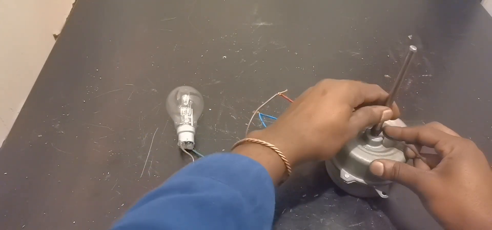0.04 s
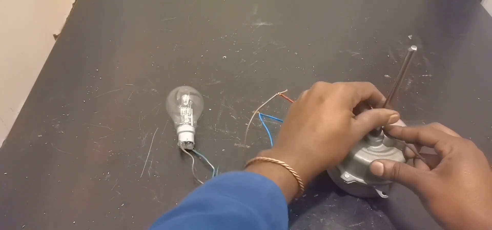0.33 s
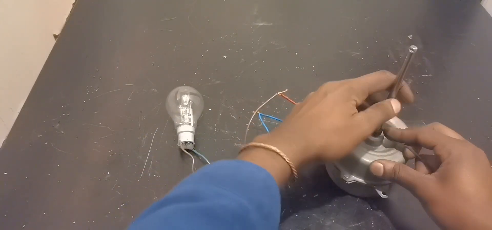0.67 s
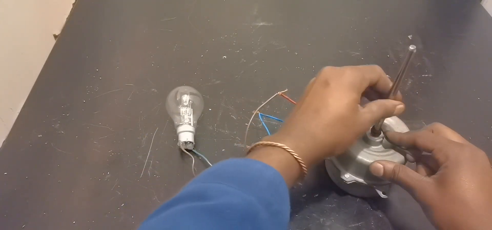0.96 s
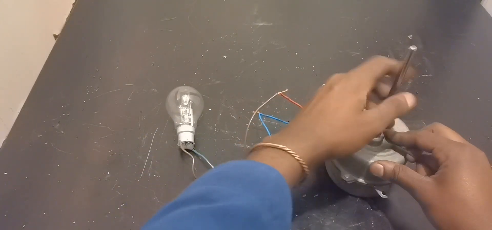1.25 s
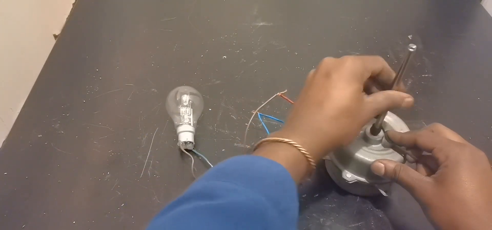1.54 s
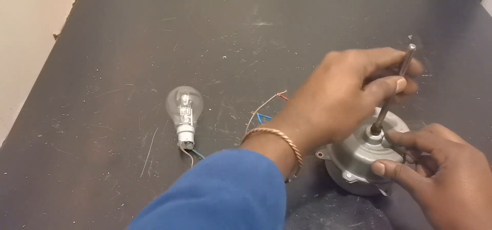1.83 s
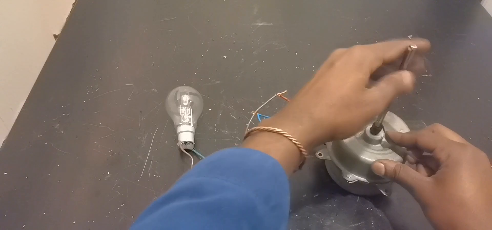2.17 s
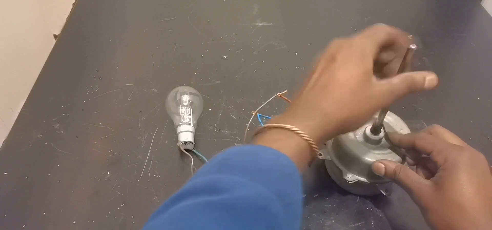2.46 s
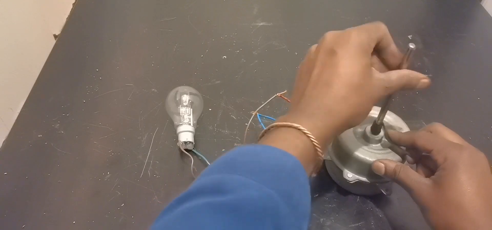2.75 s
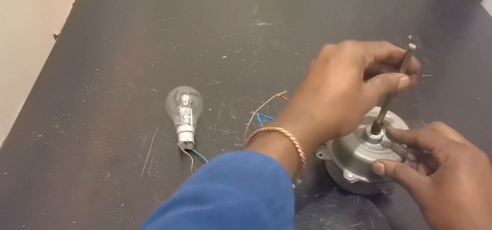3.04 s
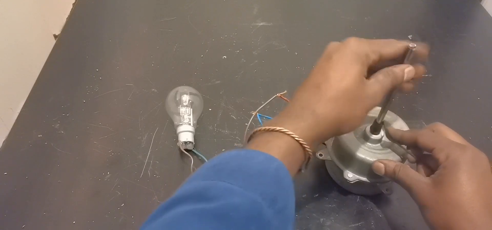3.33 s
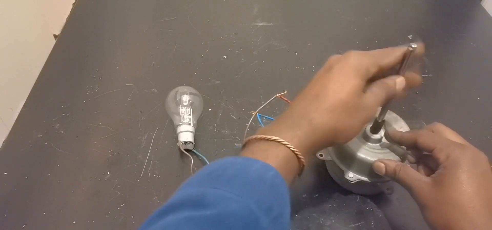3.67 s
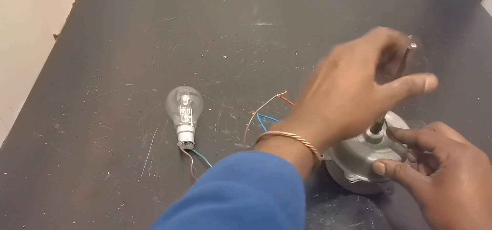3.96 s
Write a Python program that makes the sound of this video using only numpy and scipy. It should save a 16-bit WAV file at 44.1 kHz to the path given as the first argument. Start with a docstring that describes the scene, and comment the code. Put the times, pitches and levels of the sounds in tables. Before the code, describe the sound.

A small electric motor is twisted by hand on a table, giving short, rough whirs with a low hum and dry bearing rattle. The pulses grow louder, with soft thumps and faint ticks, close by in a quiet room.

```python
"""Twisting a small motor by hand.

One hand holds an electric motor on a table in a small quiet room; the other twists its shaft,
again and again and ever harder. The rotor judders and hums through the table top, and the dry
bearings rattle and hiss in the metal housing. The motor rocks, thumps and clunks as the
fingers take hold, with a few faint ticks."""
import sys
import numpy as np
from scipy import signal
from scipy.fft import rfft, irfft
from scipy.io import wavfile
from scipy.ndimage import uniform_filter1d

SR = 44100
rng = np.random.default_rng(int(sys.argv[2]) if len(sys.argv) > 2 else 0)


def inscribe(sig):
    """Save sig as 16-bit PCM at rate SR to the path in sys.argv[1].

    A 1-D sig is mono; a 2-D sig holds one channel per row.
    Samples are clipped to [-1, 1] before scaling.
    """
    pcm = np.round(np.clip(np.atleast_2d(sig).T, -1, 1) * 32767)
    wavfile.write(sys.argv[1], SR, pcm.astype(np.int16))


N = 176400  # 4 seconds
LEFT_VS_RIGHT = np.array([[1], [-1]])


def undb(db):
    """Turn decibels into a number to multiply by."""
    return 10 ** (np.asarray(db) / 20)


def unit(x):
    """Scale a sound to an average power of 1."""
    return x / np.sqrt(np.mean(x ** 2))


def steady(x, span_s):
    """Even out the slow swells of a vibration."""
    power = np.mean(np.atleast_2d(x) ** 2, axis=0)
    span = max(int(span_s * SR), 2)
    smooth_power = uniform_filter1d(uniform_filter1d(power, span), span)
    return x / np.sqrt(np.abs(smooth_power) + 1e-18)


def wander(per_s):
    """A smooth random drift, roughly between -1 and 1."""
    hold = int(SR / per_s)
    steps = np.repeat(rng.standard_normal(N // hold + 1), hold)
    return 1.3 * uniform_filter1d(uniform_filter1d(steps, hold), hold)[:N]


def frequencies():
    """The frequencies the filters work on, in Hz."""
    return np.maximum(np.arange(N + 1) * SR / (2 * N), 1)


def colour(x, points):
    """Shape the bass and treble along a curve of (frequency [Hz], level [dB]) points."""
    hz, db = np.array(points).T
    gain = undb(np.interp(np.log(frequencies()), np.log(hz), db))
    cepstrum = irfft(np.log(gain))
    cepstrum[1:N] *= 2  # folded forward, so nothing sounds before its cause
    cepstrum[N + 1:] = 0
    return irfft(rfft(x, 2 * N) * np.exp(rfft(cepstrum)))[..., :N]


def ring(x, notes):
    """Shake an object so that it rings at its own notes."""
    f = frequencies()
    gain = 0
    for k, (hz, width, db) in enumerate(notes):
        resonance = undb(db) / (1 + 1j * (f * f - hz * hz) / (f * width))
        softening = 1 + 1j * f / hz - (f / hz) ** 2 / 2  # contact dulls what lies far above the note
        gain = gain + (-1) ** k * resonance / softening
    return irfft(rfft(x, 2 * N) * gain)[..., :N]


def burst(fade_s, channels):
    """A puff of noise that falls by 60 dB in fade_s."""
    t = np.arange(SR // 2) / SR
    x = rng.standard_normal((channels, len(t))) * np.exp(-np.log(1000) * t / fade_s)
    return x / np.sqrt(np.sum(x ** 2, axis=1, keepdims=True))


def clicks(times, sizes):
    """One sharp click at each time, given in seconds."""
    inside = (times >= 0) & (times < (N - 1) / SR)
    return np.bincount((times[inside] * SR).astype(int), sizes[inside], N)


def impacts(per_s, jitter, scatter_db):
    """A run of tiny hits, uneven in timing (jitter) and strength (scatter)."""
    gap, size = rng.standard_normal((20000, 2)).T
    times = np.cumsum(np.exp(jitter * gap)) / per_s
    hits = clicks(times, undb(scatter_db * size))
    return hits - hits.mean()


def pan(x, pan_db):
    """Make the left side pan_db louder than the right."""
    return x * undb(LEFT_VS_RIGHT * pan_db / 2)


def room(x, echo_db, pan_db=0):
    """Add the small room's echo, different on the left and right."""
    echo = signal.fftconvolve(x[None], burst(fade_s=.2, channels=2), axes=1)[:, :N]
    return pan((x + undb(echo_db) * echo) / np.hypot(1, undb(echo_db)), pan_db)


# tone of the room's air (frequency [Hz], level [dB])
AIR_TONE = [(20, 4), (33, 2.5), (50, -10.5), (80, -0.5), (140, -1), (250, -10), (400, -19.5), (630, -19.5),
            (1050, -26.5), (1600, -29.5), (3200, -34), (6500, -37.5), (8000, -44.5), (10000, -60.5),
            (13000, -52)]
# tone of the microphone's hiss (frequency [Hz], level [dB])
MIC_TONE = [(11000, -30), (12400, -11.5), (13000, -9.5), (16000, -8)]


def room_tone():
    """Quiet air, alike left and right in the bass, and thin microphone hiss."""
    middle, side = colour(rng.standard_normal((2, N)), AIR_TONE)
    side = signal.sosfilt(signal.butter(1, 456, "high", fs=SR, output="sos"), side)
    air = unit(middle + undb(1) * side * LEFT_VS_RIGHT)
    hiss = unit(colour(rng.standard_normal((2, N)), MIC_TONE)) * undb([[2.2], [-3.2]])
    return undb(-53) * air + undb(-74.5) * hiss


# swells of the motor's hum and rattle: twists of the shaft and, at 3.12 s, a thump ringing on
# (peak time [s], rise [s], fall [s], four levels, one per hum note [dB],
# rattle level [dB], shell level [dB], end cap level [dB])
MOTOR_SWELLS = [(0.28, 0.047, 0.055, -47, -42, -46, -63, -71, -90, -81),
                (0.534, 0.1, 0.049, -40.5, -42.5, -47.5, -52.5, -69.5, -72.5, -76),
                (0.991, 0.05, 0.2, -46, -42, -47.5, -61.5, -67, -72.5, -78.5),
                (1.191, 0.061, 0.056, -36.5, -30.5, -30.5, -41.5, -53.5, -56.5, -66),
                (1.258, 0.034, 0.048, -38.5, -47, -39, -61, -71, -68.5, -74),
                (1.461, 0.018, 0.16, -46.5, -48, -58.5, -69, -68, -70.5, -82),
                (1.622, 0.031, 0.023, -33, -40.5, -41.5, -52, -54.5, -58, -63.5),
                (1.734, 0.073, 0.067, -37.5, -34, -38.5, -44.5, -52, -55.5, -61),
                (2.119, 0.062, 0.065, -30.5, -27, -47.5, -47, -49.5, -57, -62),
                (2.412, 0.028, 0.073, -36.5, -34.5, -52.5, -60, -77, -74, -67),
                (2.52, 0.061, 0.065, -37.5, -28, -28.5, -52.5, -45, -49, -57),
                (2.873, 0.055, .072, -31, -28.5, -26.5, -48, -41, -50.5, -54.5),
                (3.12, 0.024, 0.037, -28.5, -30, -44.5, -53.5, -69, -77, -87),
                (3.282, 0.071, 0.069, -35, -26.5, -33.5, -45, -43.5, -49, -58),
                (3.587, 0.033, 0.097, -30.5, -28, -35.5, -37.5, -41, -44, -53.5),
                (3.719, 0.038, 0.038, -27.5, -34.5, -28, -31, -40.5, -49, -66.5),
                (3.87, 0.054, .045, -23.5, -29, -40.5, -40, -45.5, -54, -77),
                (4.00, 0.049, 0.076, -21.5, -33.5, -37, -59.5, -40.5, -46.5, -56)]


def swelling(levels_db, lead_s, length=1):
    """Loudness over time: each swell grows, peaks lead_s before its listed time and dies down."""
    steepness, tail_db, tail_stretch = 2.42, -19.5, 2.32
    t = np.arange(0, N + 64, 64) / SR + lead_s
    power = 0
    for (at, rise, fall, *_), db in zip(MOTOR_SWELLS, levels_db):
        away = np.abs(t - at) / (length * np.where(t < at, rise, fall))
        peak = np.exp(-away ** steepness)
        tails = undb(tail_db) ** 2 * np.exp(-(away / tail_stretch) ** 2)  # faint, on either side
        power = power + undb(db) ** 2 * (peak + tails)
    return np.interp(np.arange(N) / SR + lead_s, t, np.sqrt(power))


# the four notes the motor hums on the table (pitch [Hz])
HUM_NOTES = [139, 195, 250, 329]
# how far each note trails the swell; below zero is early (delay [s])
HUM_DELAYS = [0.0045, -0.006, 0.0069, -0.0023]
# notes of the table top; narrow ones ring longer (pitch [Hz], width [Hz], level [dB])
TABLE_NOTES = [(130, 6.8, -22.5), (155, 10, -3.5), (209.6, 6.3, 5), (231, 23, -2), (265, 31, -4),
               (303.7, 61, -10.5), (395, 4.7, -30)]


def rotor():
    """The juddering rotor keeps four wavering notes humming and makes the table top rumble."""
    levels = np.array(MOTOR_SWELLS).T[3:7]
    swells = np.array([swelling(db, lead_s=-delay) for db, delay in zip(levels, HUM_DELAYS)])
    hum = 0
    for hz, swell in zip(HUM_NOTES, swells):
        pitch = hz * (1 + .028 * wander(per_s=24))
        phase = 2 * np.pi * np.cumsum(pitch) / SR
        flutter = undb(2.6 * wander(per_s=32))
        hum = hum + swell * unit(np.sin(phase) * flutter)
    judder = impacts(per_s=56, jitter=.25, scatter_db=2)
    rumble = steady(ring(judder, TABLE_NOTES), span_s=.06) * np.linalg.norm(swells, axis=0)
    return room(undb(-2.5) * hum + undb(-8) * rumble, echo_db=-14, pan_db=1.3)


def radiate(pair, pan_db):
    """Two vibrations leave different faces of the housing, so left and right differ."""
    middle, side = pair
    return pan(room(middle, echo_db=-17.5) + undb(-2) * side * LEFT_VS_RIGHT, pan_db)


# notes of the metal housing, its thin shell and its end cap (pitch [Hz], width [Hz], level [dB])
HOUSING_NOTES = [(451, 9, 7), (478, 11, 6), (535, 8, 11.5), (595, 14, 2), (655, 25, -3), (730, 40, -5),
                 (796, 24, 1.5), (868, 20, 2.5), (938, 24, 1.5), (1005, 30, -1), (1148, 22, -3),
                 (1267, 24, -8), (1440, 60, -22), (1600, 80, -23)]
SHELL_NOTES = [(1046, 10, 0), (1092, 12, -2.5)]
CAP_NOTES = [(1825, 50, -5), (1886, 32, 0), (1925, 32, -.5), (1985, 50, -5), (2090, 45, -9),
             (3200, 220, -26)]
# tone of the scraping balls and of the hissing grit (frequency [Hz], level [dB])
SCRAPE_TONE = [(380, -22), (480, -4), (900, 0), (1200, -2), (1600, -7), (2150, -10), (2600, -21),
               (4500, -29), (8000, -50)]
GRIT_TONE = [(2000, -14), (3200, -3), (4000, -9), (5200, -9), (6500, 2), (8000, -1), (9500, -13),
             (12000, -20), (15500, -20)]


def bearings():
    """Dry balls rattle the housing and ring its shell and end cap; grit hisses as the fingers press."""
    rattle_db, shell_db, cap_db = np.array(MOTOR_SWELLS).T[7:]
    balls = np.array([impacts(per_s=1500, jitter=.97, scatter_db=3) for _ in range(2)])
    rattle = unit(ring(balls, HOUSING_NOTES)) + undb(-12) * unit(colour(balls, SCRAPE_TONE))
    rattle = steady(radiate(rattle, pan_db=1.5), span_s=.02)
    shell = steady(radiate(ring(balls, SHELL_NOTES), pan_db=0), span_s=.074)
    cap = steady(radiate(ring(balls, CAP_NOTES), pan_db=-3), span_s=.18)
    grit = colour(impacts(per_s=9000, jitter=.98, scatter_db=3), GRIT_TONE)
    hiss = unit(room(grit, echo_db=2, pan_db=-2))
    # in a twist, the fingers press hardest just before top speed
    return (rattle * swelling(rattle_db, lead_s=.011)
            + shell * swelling(shell_db, lead_s=.0071)
            + (cap + undb(-12.5) * hiss) * swelling(cap_db, lead_s=.026, length=.8))


# ticks of fingers and loose metal (time [s], level [dB], low edge [Hz], high edge [Hz], fade [s])
SMALL_TICKS = [(.606, -63, 7500, 7900, 0.033), (.62, -62.5, 7400, 8100, 0.035),
               (1.083, -52, 1520, 3100, 0.06), (1.092, -49, 1504, 1740, 0.039),
               (1.106, -55, 1660, 2960, 0.026), (1.414, -51, 1610, 3440, 0.047),
               (1.432, -65.5, 2940, 3550, 0.26), (1.806, -50, 3200, 7640, 0.012),
               (2.034, -62.5, 6830, 10900, 0.04), (2.649, -61.5, 2020, 8000, 0.03),
               (2.782, -46.5, 644, 1420, 0.045), (2.885, -55, 2790, 3640, 0.22),
               (3.659, -48, 2400, 6940, 0.13)]


def ticks():
    """Nails and loose metal touch lightly, each a puff of noise in its own range of pitch."""
    track = np.zeros(N)
    for at, db, low, high, fade_s in SMALL_TICKS:
        band = signal.butter(4, [low, high], "band", fs=SR, output="sos")
        tick = signal.sosfilt(band, burst(fade_s, channels=1)[0])
        start = int(at * SR)
        track[start:start + len(tick)] += (undb(db) * tick / np.abs(tick).max())[:N - start]
    return room(track, echo_db=-.82)


# thumps of the motor on the table (time [s], knock level [dB], rocking level [dB])
TABLE_THUMPS = [(0.719, -63.5, -52.5), (0.925, -36.5, -44), (1.414, -32.5, -37.5), (1.45, -31, -49),
                (1.781, -30, -38.5), (1.913, -36.5, -44.5), (2.065, -21.5, -52), (2.306, -30.5, -32),
                (2.697, -42, -43), (2.804, -22.5, -55.5), (2.86, -23.5, -45.5), (2.875, -25, -45.5),
                (3.083, -18.5, -28.5), (3.294, -17.5, -47), (3.432, -31, -36), (3.615, -28.5, -26.5),
                (3.676, -12, -24.5), (3.826, -15.5, -28), (3.842, -18, -52)]
# notes of the motor's base knocking and rocking (pitch [Hz], width [Hz], level [dB])
KNOCK_NOTES = [(140.4, 30, 5.5), (195.1, 40, 3), (240, 100, -8.5), (318, 20, -15.5), (446, 50, -21.5)]
ROCK_NOTES = [(78, 13, 0), (96, 22, -8)]
# tone of a soft push (frequency [Hz], level [dB])
PUSH_TONE = [(30, -32.5), (50, -19), (70, -5), (250, -4.5), (400, -15.5), (800, -18.5), (3000, -44.5)]


def thumps():
    """The motor knocks softly against the table and rocks."""
    at, knock_db, rock_db = np.array(TABLE_THUMPS).T
    track = 0
    for notes, db in ((KNOCK_NOTES, knock_db), (ROCK_NOTES, rock_db)):
        blow = colour(ring(signal.unit_impulse(N), notes), PUSH_TONE)
        track = track + signal.fftconvolve(clicks(at, undb(db)), blow / np.abs(blow).max())[:N]
    return room(track, echo_db=-10.5)


# jolts of the metal housing (time [s], level [dB])
JOLTS = [(1.419, -50), (1.436, -62), (3.681, -27), (3.706, -32.5), (3.83, -32)]
# tone of a jolt's dull crack (frequency [Hz], level [dB])
CRACK_TONE = [(300, -20), (450, -3), (850, 0), (1200, -4), (1500, -14), (2000, -17), (2400, -32),
              (5000, -50)]


def clunks():
    """A hard jolt makes a dull crack and sets the housing and its shell ringing."""
    at, db = np.array(JOLTS).T
    contact = np.zeros((2, N))
    contact[:, :SR // 2] = burst(fade_s=.03, channels=2)
    ringing = unit(ring(contact, HOUSING_NOTES + SHELL_NOTES))
    crack = unit(colour(contact, CRACK_TONE))
    blow = radiate(ringing + undb(-1) * crack, pan_db=1.5)
    return signal.fftconvolve(clicks(at, undb(db))[None], blow / np.abs(blow).max(), axes=1)[:, :N]


def scene():
    """Room, motor and hands together."""
    return room_tone() + rotor() + bearings() + ticks() + thumps() + clunks()


def record(dry):
    """Cut away the very highest treble."""
    return signal.sosfilt(signal.ellip(10, .2, 70, 15750, fs=SR, output="sos"), dry)


dry = scene()
out = record(dry)
inscribe(out)
```